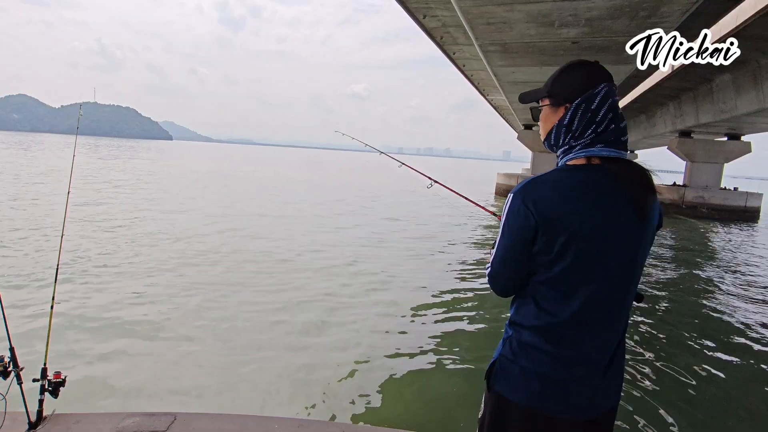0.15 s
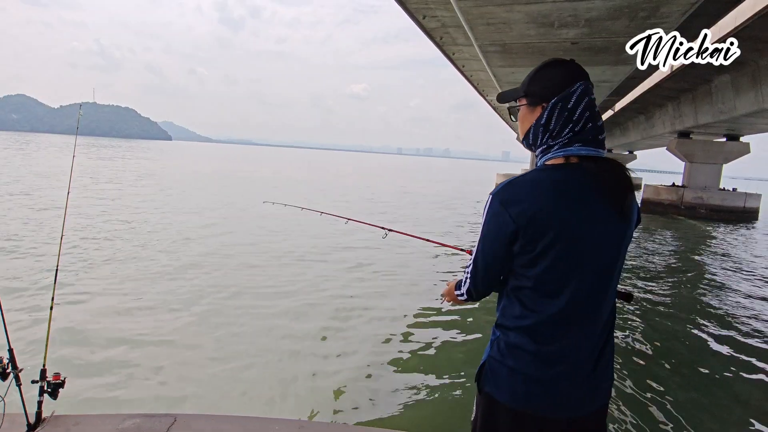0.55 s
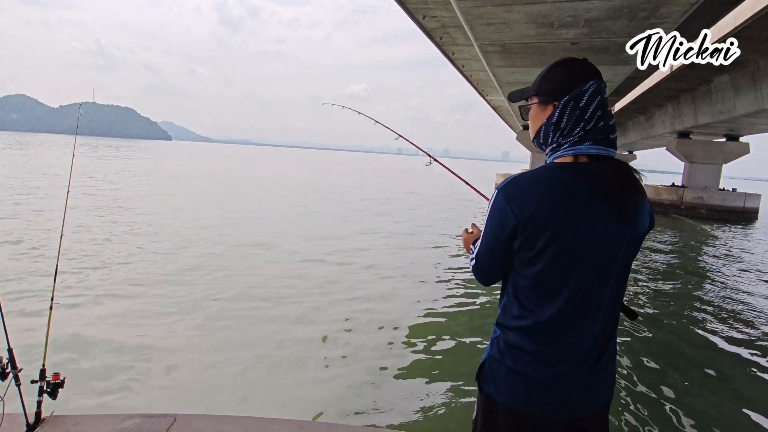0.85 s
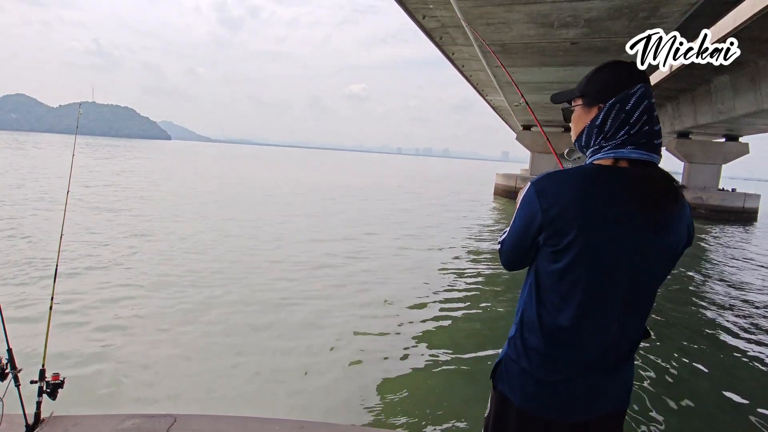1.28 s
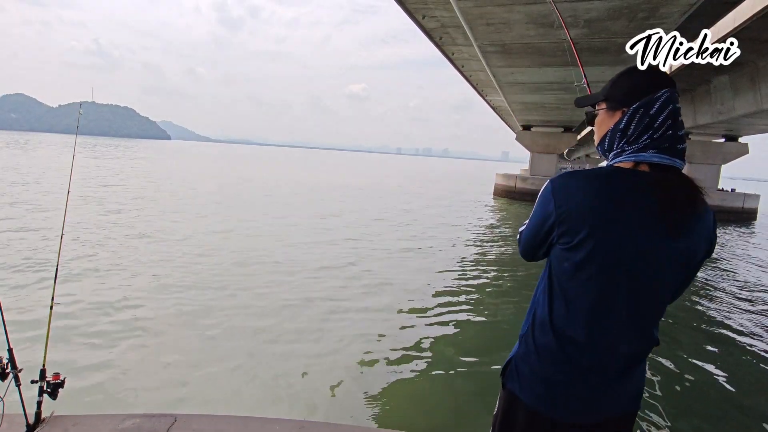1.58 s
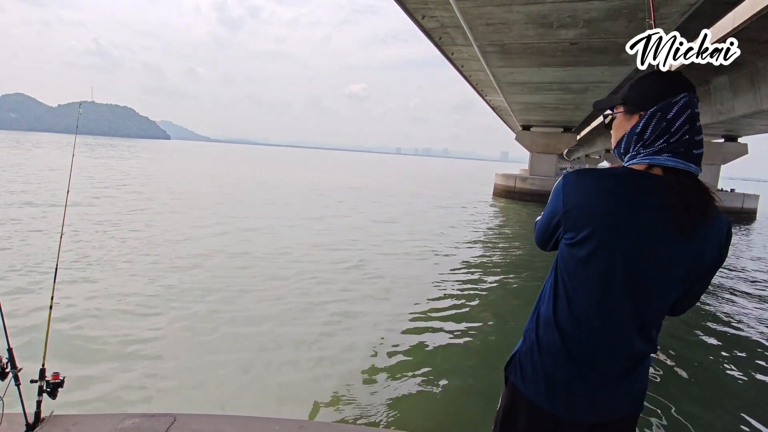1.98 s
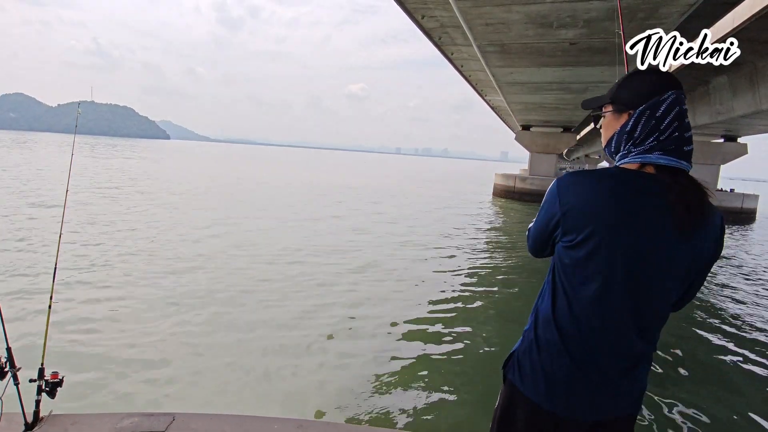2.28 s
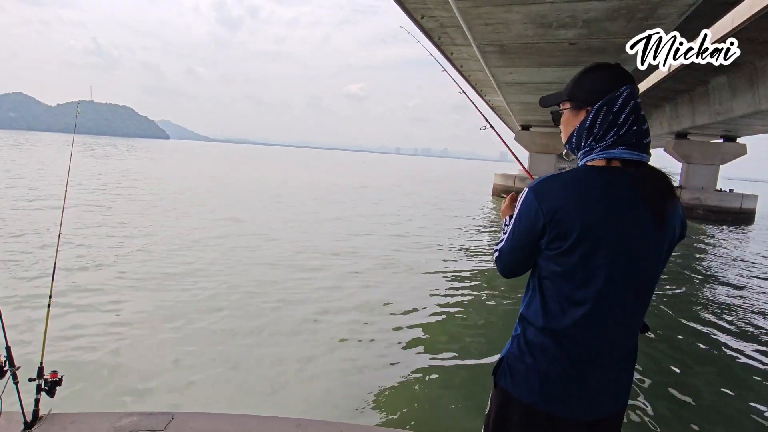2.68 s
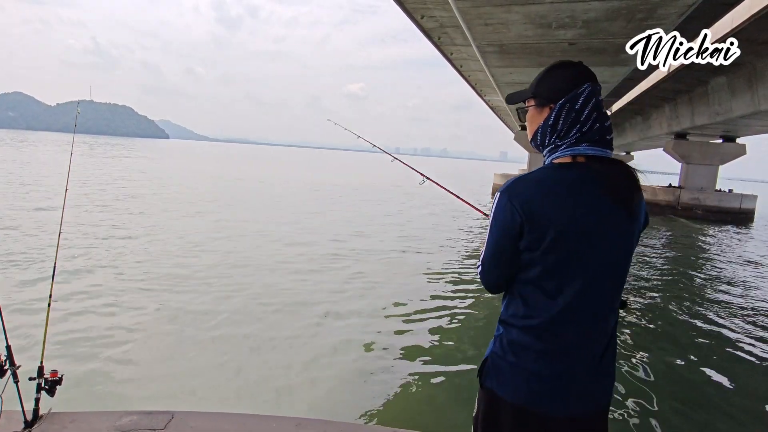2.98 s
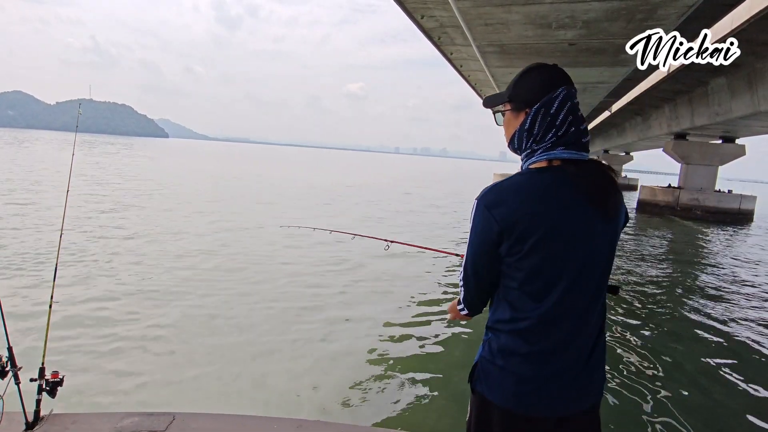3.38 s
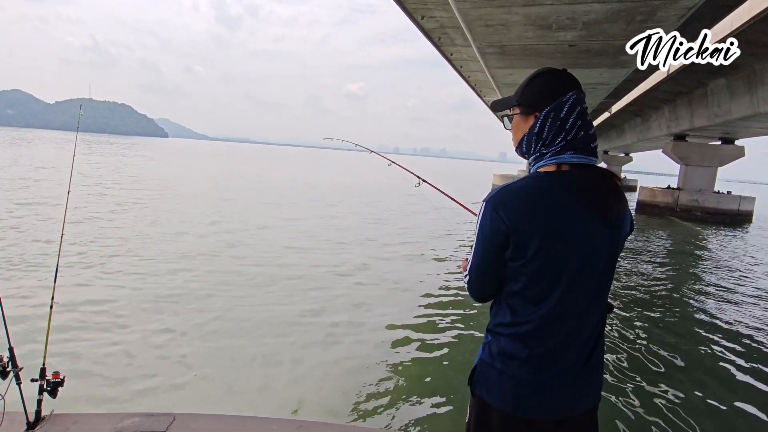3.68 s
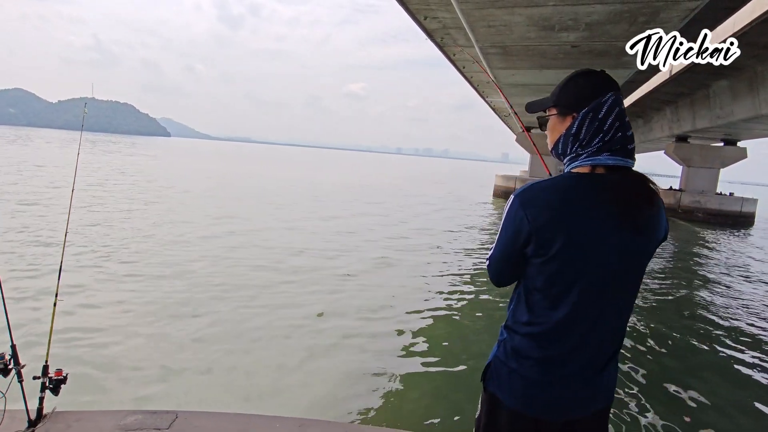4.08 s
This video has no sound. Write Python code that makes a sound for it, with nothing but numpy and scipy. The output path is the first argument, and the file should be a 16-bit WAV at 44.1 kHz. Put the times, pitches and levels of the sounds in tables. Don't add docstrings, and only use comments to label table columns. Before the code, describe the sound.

Heavy traffic rumbles and roars across a concrete bridge overhead while a fishing reel whirrs and hisses close by in two bouts.

```python
import sys
import numpy as np
from scipy import signal
from scipy.fft import rfft, irfft, next_fast_len
from scipy.io import wavfile
from scipy.ndimage import minimum_filter1d

SR = 44100
rng = np.random.default_rng(int(sys.argv[2]) if len(sys.argv) > 2 else 0)


def to_wav(sig):
    pcm = np.clip(np.atleast_2d(sig), -1, 1) * 32767
    pcm = np.round(pcm).astype(np.int16)
    wavfile.write(sys.argv[1], SR, pcm.T)


def convert_level_to_amplitude(level_db):
    exponent = np.asarray(level_db, float) / 20
    return 10 ** exponent


N = 187204
TIME_S = np.arange(N) / SR
SIZE = next_fast_len(N)
HZ = np.maximum(np.arange(SIZE // 2 + 1) * SR / SIZE, 1)
MEAN_ROAR_DB = -22

# f/Hz, density/dB per Hz
DECK_COLOUR = [(11, -44), (18, 0.5), (48, 1), (97, 2), (136, -5.5), (215, -2.5), (456, -17), (700, -13.5),
               (910, -39.5), (1540, -120)]
# f/Hz, width/Hz, lift/dB
GIRDER_MODES = [(59.6, 7.9, 9.5), (89.6, 5, 8.5), (107.9, 21, 10)]
# f/Hz, density/dB per Hz
TYRE_COLOUR = [(330, -35.5), (560, -4.5), (1100, -0.5), (1830, -12.5), (2200, -6.5), (2860, -48),
               (4840, -120)]
# f/Hz, density/dB per Hz
REEL_COLOUR = [(1120, -34), (1900, 5.5), (2520, 2), (2770, 1), (3250, -3), (4230, -6.5), (4830, -8),
               (5370, -11), (6120, -9), (6690, -11), (7900, -11), (8630, -13), (9340, -30), (12000, -30.5),
               (15600, -40.5)]
# f/Hz, likeness/0..1
LIKENESS = [(60, 1), (120, 0.95), (240, 1), (480, 0.91), (750, 0.81), (1100, 0.3), (1900, 0.48),
            (3800, 0.089)]
# f/Hz, left-right/dB
PORTS = [(60, 1.8), (200, -0.5), (500, 0), (1200, .5), (2700, 2), (4500, 1.5), (6200, 6), (7200, 7.5),
         (8100, 23.5), (8900, 10), (9600, 3.5), (11000, 4.5), (15000, 6)]
# t/s, strength/dB, slab over girder/dB
AXLES = [(0.088, -25, -12), (0.211, -23.5, -5), (.4, -23.5, -7), (.65, -18.5, 0), (0.749, -18.5, 1.5),
         (1.049, -18, 0.5), (1.17, -22.5, 1), (1.28, -18.5, -5), (1.46, -16.5, 3), (1.66, -18.5, 2.5),
         (1.77, -16.5, 0), (1.95, -23.5, 3.5), (2.071, -19.5, 8), (2.22, -20, 10), (2.43, -21, 7),
         (2.58, -21.5, 4), (2.72, -19.5, 2), (2.889, -16.5, -1.5), (2.99, -17, -0.5), (3.28, -19, 1.5),
         (3.4, -19, -10), (3.5, -19, 2.5), (3.66, -27, -11.5), (3.862, -18.5, -6), (3.99, -24, -6.5),
         (4.102, -16.5, -9)]
# t/s, roar level/dB, tread resonance f/Hz, brightness/dB
TRAFFIC = [(0, -31.5, 890, -8.5), (.2, -29, 930, -12.5), (.45, -24.5, 920, -15), (.6, -23, 874, -15.5),
           (.85, -22, 1070, -10), (1.1, -24.5, 1190, -8), (1.4, -23, 1050, -8.5), (1.57, -26, 1090, -6.5),
           (1.9, -23, 1080, -11), (2.3, -22.5, 1190, -8), (2.55, -21, 1120, -7), (2.8, -18.5, 1144, -12),
           (3.1, -18, 1170, -14), (3.27, -21, 1070, -12), (3.47, -16, 940, -20.5), (3.68, -19, 915, -18.5),
           (3.85, -23, 880, -15), (4.24, -26, 956, -13.5)]
# start t/s, end t/s, first f/Hz, last f/Hz, level/dB
NOTES = [(1.98, 2.32, 182, 165, -20), (2.6, 3.08, 112, 99, -22), (1.82, 2.02, 1095, 1075, -27),
         (.84, 1.06, 2680, 2560, -35), (3.2, 3.55, 2700, 2560, -38), (.02, .09, 7400, 7400, -52),
         (.29, .315, 6100, 6000, -54), (3.65, 3.84, 4800, 4900, -52), (3.11, 3.145, 6300, 6300, -43),
         (3.22, 3.29, 9900, 11900, -51), (3.76, 3.78, 12900, 12900, -57), (.68, .87, 11700, 11900, -56)]
# t/s, peak level/dB, low ring f/Hz, high ring f/Hz, left-right/dB
TICKS = [
    (3.211, -29, 6200, 7800, 11),
    (3.57, -43, 11000, 12400, -2),
    (4.0815, -36.5, 11700, 14400, 2),
    (4.0821, -16, 5660, 8070, -2.5),
    (4.0867, -19, 4240, 6570, 6),
]
# t/s, effort level/dB, gear ring f/Hz
WINDING = [
    [(.36, -91, 2450), (.49, -68.5, 2570), (.54, -58, 2700), (.565, -47, 2390), (.76, -49.5, 2270),
     (.88, -52, 2620), (1.1, -63, 2450), (1.4, -76, 2250), (1.7, -92, 2350)],
    [(2.35, -83, 2370), (2.55, -73.5, 2330), (3.09, -59, 2550), (3.135, -52, 2730), (3.29, -50.5, 2770),
     (3.5, -55, 2530), (3.76, -61.5, 2600), (3.9, -77, 2570), (4.05, -76, 2430)],
]
# t/s, level/dB, half length/s
STRAINS = [
    (0.882, -31, 0.082),
    (3.442, -33.5, 0.044),
]


def in_time(rows):
    times_s, *columns = np.transpose(rows)
    return [np.interp(TIME_S, times_s, column) for column in columns]


def at_hz(points, hz):
    points_hz, values = np.transpose(points)
    return np.interp(np.log(hz), np.log(np.maximum(points_hz, 1)), values)


def drift(rate_hz):
    pole = np.exp(-128 * np.pi * rate_hz / SR)
    white = rng.standard_normal(N // 64 + 1002)
    slow = signal.lfilter([1], [1, -2 * pole, pole * pole], white)[1000:]
    return np.interp(np.arange(N) / 64, np.arange(len(slow)), slow / slow.std())


def mix_db(*levels_db):
    return 10 * np.log10(sum(convert_level_to_amplitude(2 * db) for db in levels_db))


def pair(alike):
    mid, side = rfft(rng.standard_normal((2, SIZE)))
    mid = np.sqrt(1 + alike) * mid
    side = np.sqrt(1 - alike) * side
    return np.array([mid + side, mid - side]) / np.sqrt(2)


def hump(centre_hz, lift_db, octaves):
    def lift(hz):
        return lift_db * np.exp(-0.5 * (np.log2(hz / centre_hz) / octaves) ** 2)
    return lift


def zone(noise, low_hz, high_hz, level_db, lift_db, patchy_db, count):
    step = np.log(high_hz / low_hz) / count
    out, power = 0, 0
    for hz in low_hz * np.exp(step * (np.arange(count) + 0.5)):
        band = noise * np.sqrt(np.clip(1 - np.abs(np.log(HZ / hz)) / step, 0, 1))
        gain = convert_level_to_amplitude(lift_db(hz) + patchy_db * drift(5.05))
        out = out + gain * irfft(band, SIZE)[:, :N]
        power = power + convert_level_to_amplitude(2 * lift_db(hz)) * np.sum(np.abs(band) ** 2) / SIZE ** 2
    return convert_level_to_amplitude(level_db) * out / np.sqrt(power)


def axles(slab):
    rise_s, fall_s = 0.048, 0.039
    hit_s, strength_db, tilt_db = np.transpose(AXLES)[:, :, None]
    t = np.arange(0, N + 64, 64) / SR
    shape = np.exp(-0.5 * ((t - hit_s) / np.where(t < hit_s, rise_s, fall_s)) ** 2)
    power = np.sum(shape * convert_level_to_amplitude(2 * strength_db + slab * tilt_db), axis=0)
    return np.interp(TIME_S, t, 10 * np.log10(power + 1e-12))


def deck_levels():
    swing_db = in_time(TRAFFIC)[0] - MEAN_ROAR_DB
    boom_db = mix_db(axles(-1), -24 + 0.38 * swing_db)
    drone_db = mix_db(axles(1), -25.5 + 0.38 * swing_db)
    growl_db = -27 + 0.76 * swing_db + 0.05 * (drone_db - drone_db.mean())
    span_hz = 124 * 2 ** (0.04 * (drone_db - boom_db))
    return boom_db, drone_db, growl_db, span_hz


def deck():
    boom_db, drone_db, growl_db, span_hz = deck_levels()
    modes_db = sum(lift / (1 + (2 * (HZ - hz) / width) ** 2) for hz, width, lift in GIRDER_MODES)
    noise = pair(at_hz(LIKENESS, HZ)) * convert_level_to_amplitude(at_hz(DECK_COLOUR, HZ) + modes_db)
    span = hump(span_hz, 4.7, 0.29)
    boom = zone(noise, 27, 108, boom_db, span, patchy_db=1.8, count=5)
    drone = zone(noise, 121.7, 322, drone_db, span, patchy_db=2.04, count=5)
    growl = zone(noise, 314, 611, growl_db, span, patchy_db=0.5, count=3)
    return boom + drone + growl


def tyres():
    roar_db, tread_hz, bright_db = in_time(TRAFFIC)
    noise = pair(at_hz(LIKENESS, HZ)) * convert_level_to_amplitude(at_hz(TYRE_COLOUR, HZ))
    tread = hump(tread_hz, 6.0, 0.32)
    roar = zone(noise, 583, 1491, roar_db + 1, tread, patchy_db=1.9, count=7)
    skirt = zone(noise, 1500, 2018, roar_db + bright_db + 2, tread, patchy_db=2.0, count=2)
    return roar + skirt


def notes():
    out, wander = np.zeros(N), drift(60.0)
    for start_s, end_s, first_hz, last_hz, level_db in NOTES:
        along = np.clip((TIME_S - start_s) / (end_s - start_s), 0, 1)
        hz = (first_hz + (last_hz - first_hz) * along) * (1 + 0.02 * wander)
        swell = 4 * along * (1 - along)
        out += convert_level_to_amplitude(level_db) * swell * np.sin(2 * np.pi * np.cumsum(hz) / SR)
    return out


def ticks():
    out, t = np.zeros((2, N)), np.arange(400) / SR
    shape = 2.0 * (1 - np.exp(-t / 0.00021)) ** 2 * np.exp(-t / 0.00065)
    for hit_s, peak_db, low_hz, high_hz, pan_db in TICKS:
        rings = np.sin(2 * np.pi * low_hz * t) + 0.9 * np.sin(2 * np.pi * high_hz * t)
        sides_db = peak_db + np.array([[0.5], [-0.5]]) * pan_db
        at = round(hit_s * SR)
        out[:, at:at + 400] += convert_level_to_amplitude(sides_db) * shape * rings
    return out


def reel_levels():
    full_db, idle_db = -47, -75
    effort_db, gear_hz = in_time(np.concatenate(WINDING))
    slack_db = effort_db - full_db
    busy = np.clip((effort_db - idle_db) / (full_db - idle_db), 0, 1)

    roar_db, _, bright_db = in_time(TRAFFIC)
    skirt_db = roar_db + bright_db
    far_db = skirt_db.mean() + 0.75 * (skirt_db - skirt_db.mean())
    far_line_db = -52 + 1.26 * (roar_db - MEAN_ROAR_DB) + 0.68 * (bright_db - bright_db.mean())

    jerk_s, hold_s, fade_s = 0.54, 0.22, 0.2
    since_s = TIME_S - jerk_s
    rocking = (since_s > 0) * np.exp(-np.maximum(since_s - hold_s, 0) / fade_s)
    flutter_db = 2.3 * (1 - rocking) * drift(16.0)
    depth_db = 0.13 * busy + 1.5 * rocking

    strain_db = [db - 3.3 * ((TIME_S - at_s) / half_s) ** 2 for at_s, db, half_s in STRAINS]
    gear_db = mix_db(-32 + 0.42 * slack_db, far_db - 6, *strain_db)
    line_db = mix_db(-38 + 0.46 * (slack_db + flutter_db), far_line_db)
    air_db = mix_db(effort_db + flutter_db, -79)
    pan_db = 1 + (8.5 - 1) * busy
    direct = 0.33 * np.sqrt(busy)
    return gear_db, line_db, air_db, pan_db, gear_hz, depth_db, direct


def reel():
    wobble_hz, wobble_top_s, lag_samples = 16.2, 0.577, 15
    gear_db, line_db, air_db, pan_db, gear_hz, depth_db, direct = reel_levels()
    turn = np.cos(np.pi * wobble_hz * (TIME_S - wobble_top_s))
    throb_db = depth_db * (3 * np.abs(turn) - 2)

    def treble(hz):
        return -9.0 * (0.4 - direct) * np.log2(hz / 5500)

    noise = pair(0) * convert_level_to_amplitude(at_hz(REEL_COLOUR, HZ))
    ring = hump(gear_hz, 20.0 * direct, 0.13)
    gear = zone(noise, 1997, 3440, gear_db + 1 + 0.75 * throb_db, ring, patchy_db=1.36, count=5)
    line = zone(noise, 3490, 9140, line_db + 3.5 + throb_db, treble, patchy_db=1.77, count=6)
    air = zone(noise, 9300, 16000, air_db + 1 + 1.3 * throb_db, treble, patchy_db=1.2, count=4)
    left, right = gear + line + air
    right = direct * np.roll(left, lag_samples) + np.sqrt(1 - direct ** 2) * right
    lean = convert_level_to_amplitude((pan_db - 4.5) * 0.22)
    return np.array([left * lean, right / lean])


def scene():
    left, right = deck() + tyres() + notes()
    bridge = np.array([left, np.roll(right, 9)])
    return bridge + ticks() + reel()


def top_cut(x):
    return signal.sosfilt(signal.butter(12, 15710, fs=SR, output="sos"), x)


def record(dry):
    tilt = convert_level_to_amplitude(at_hz(PORTS, HZ) * np.array([[0.5], [-0.5]]))
    tilt = tilt / np.sqrt(np.mean(tilt ** 2, axis=0))
    ports = irfft(rfft(dry, SIZE) * tilt, SIZE)[:, :N]
    headroom = minimum_filter1d(1 / np.maximum(np.abs(ports).max(axis=0), 1), size=401)
    gain = np.convolve(headroom, np.hanning(401) / 200, "same")
    self_noise = convert_level_to_amplitude(-69.5) * rng.standard_normal((2, N))
    return top_cut(gain * ports + self_noise)


dry = scene()
out = record(dry)
to_wav(out)
```